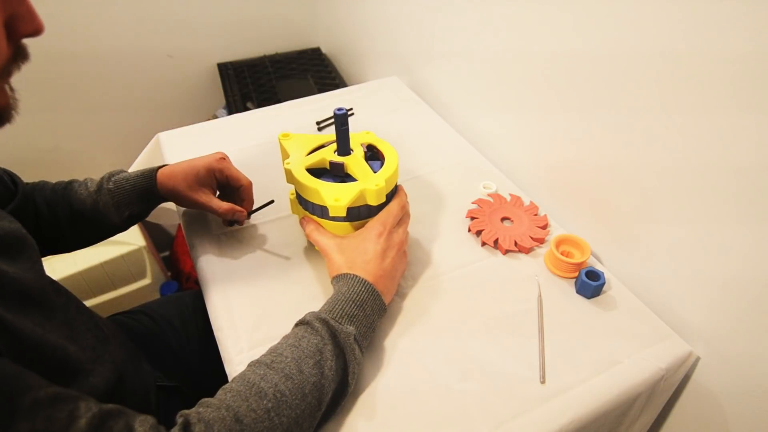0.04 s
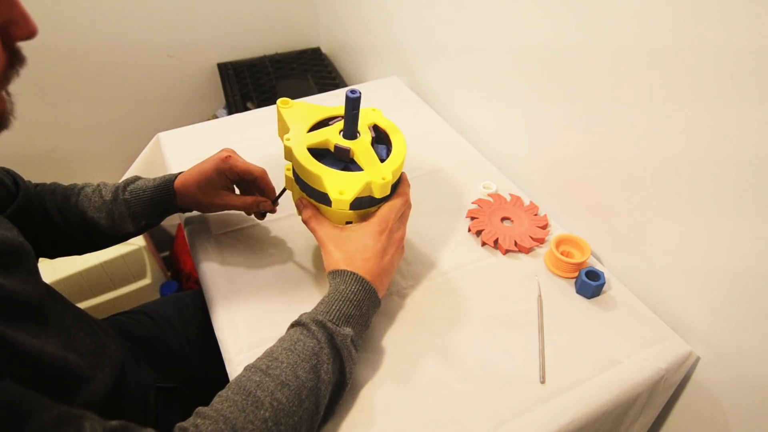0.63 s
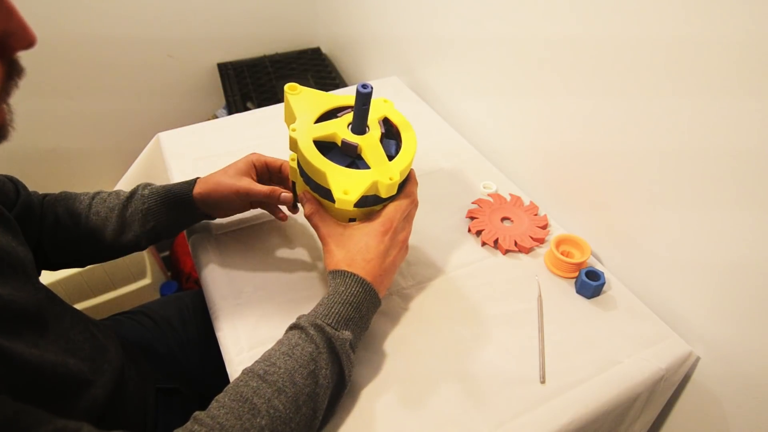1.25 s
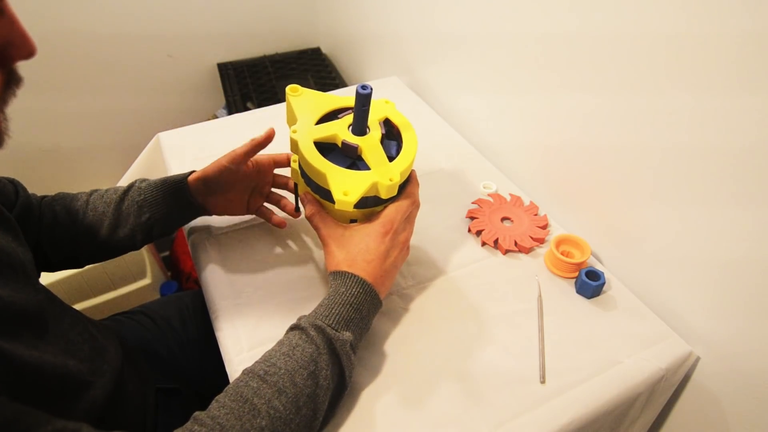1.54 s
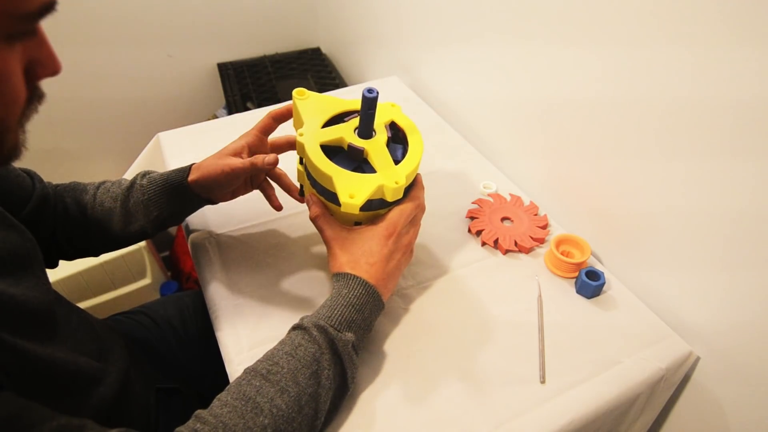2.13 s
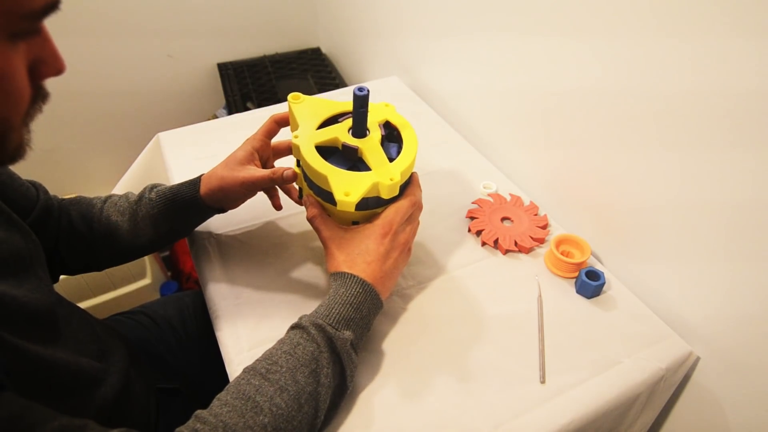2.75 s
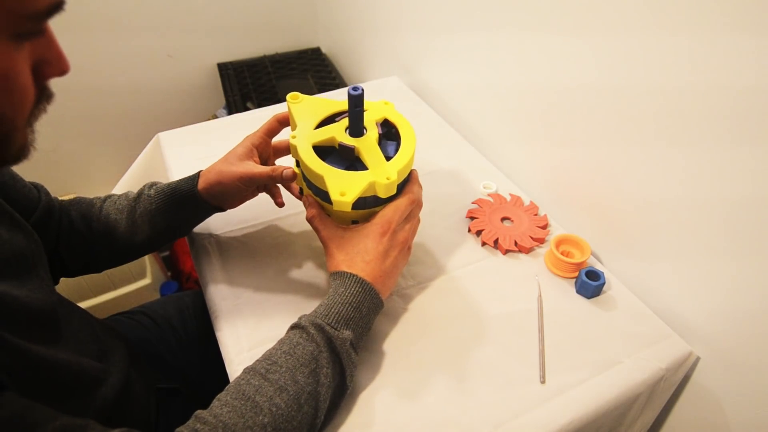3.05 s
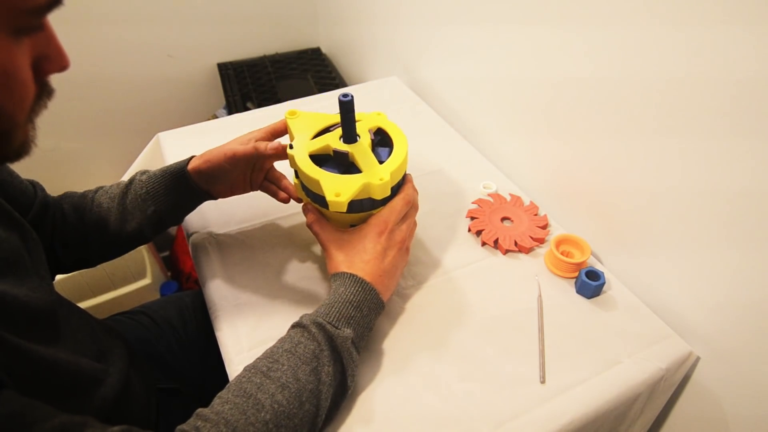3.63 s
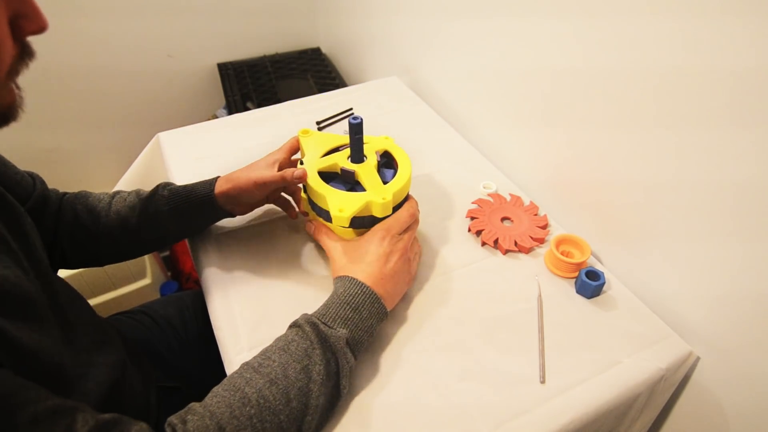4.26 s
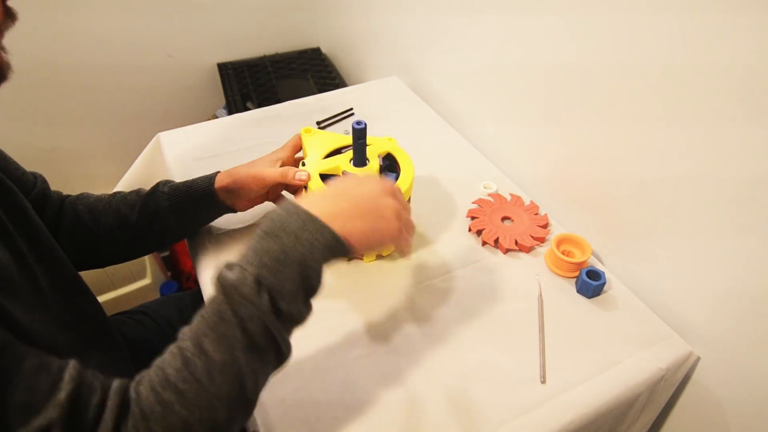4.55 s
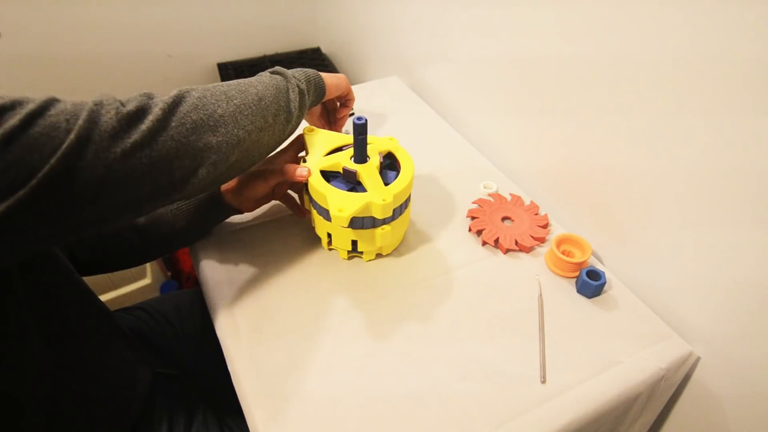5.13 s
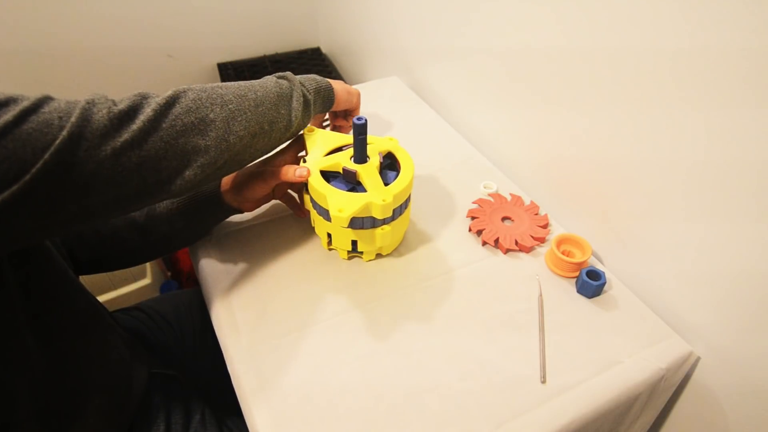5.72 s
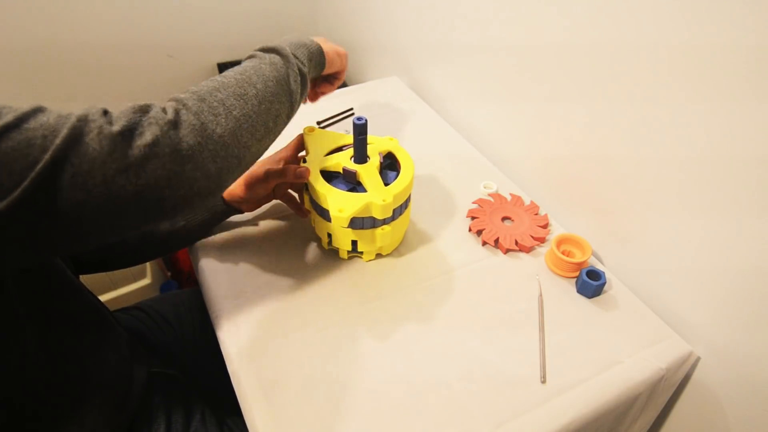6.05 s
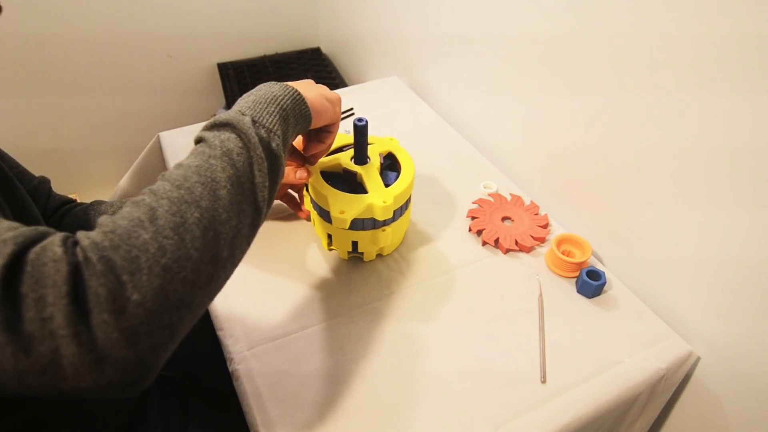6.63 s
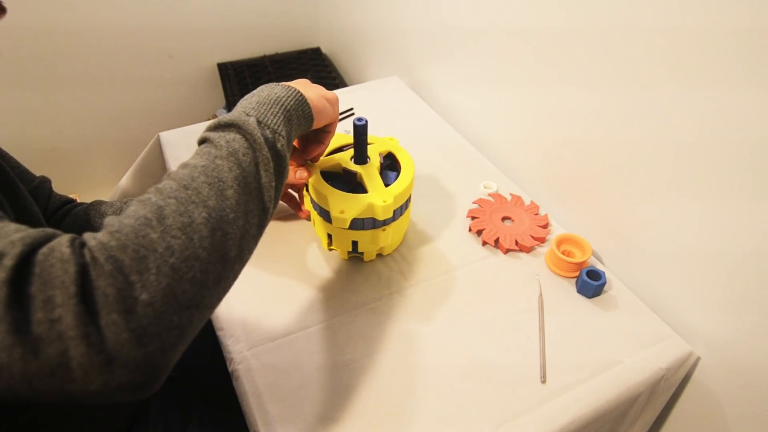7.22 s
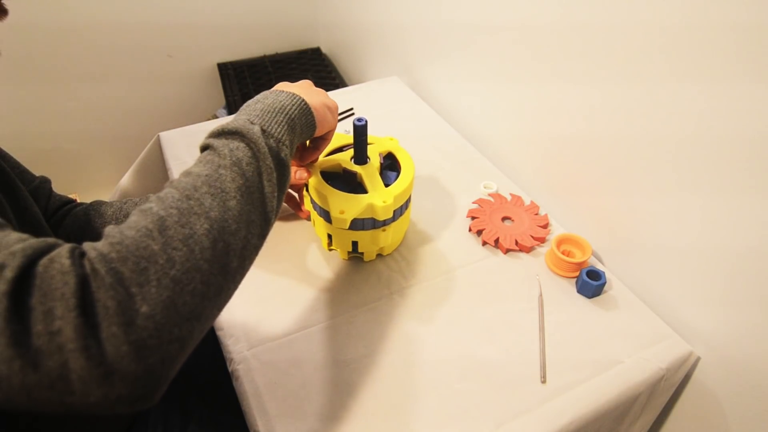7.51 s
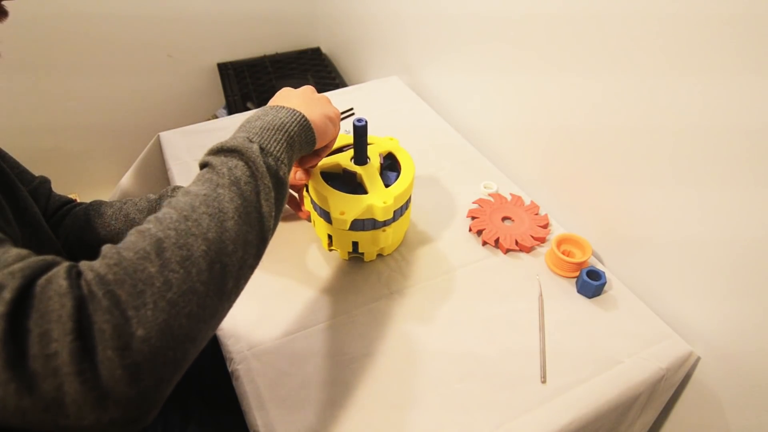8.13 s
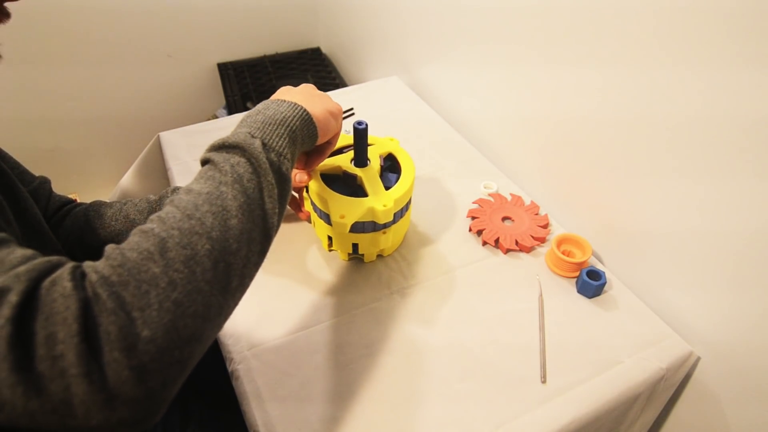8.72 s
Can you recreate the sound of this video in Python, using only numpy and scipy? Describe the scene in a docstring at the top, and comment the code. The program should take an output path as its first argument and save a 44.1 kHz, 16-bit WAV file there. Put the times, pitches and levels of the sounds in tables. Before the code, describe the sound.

Small steel bolts tap and click against a hollow plastic case, scraping briefly as they slide into their holes and seating with sharp clacks. The case is set down on a cloth-covered table with a soft, low knock, and a sleeve brushes faintly past. Then fingers pick among loose bolts, which chink lightly together. The sounds are fairly close, in a small, quiet room with a faint steady hiss.

```python
"""A small, quiet room with a steady hiss. Small steel bolts are fed into the holes of a hollow plastic
case: they tap the rim, ring the shell, scrape down on their threads and seat. The case is set down on
a cloth-covered table, whose top booms, and a sleeve brushes past. Then fingers pick among the loose
bolts, which chink steel on steel."""
import sys
import numpy as np
from scipy import signal
from scipy.fft import rfft, irfft, next_fast_len
from scipy.io import wavfile
from scipy.ndimage import uniform_filter1d

SR = 44100
rng = np.random.default_rng(int(sys.argv[2]) if len(sys.argv) > 2 else 0)


def materialize(psi):
    """Save the field psi as 16-bit PCM at rate SR to the path in sys.argv[1].

    A 1-D psi becomes a single channel; in a 2-D psi each row is a channel.
    """
    bounded = np.clip(np.atleast_2d(psi).T, -1, 1)
    quanta = np.round(bounded * 32767).astype(np.int16)
    wavfile.write(sys.argv[1], SR, quanta)


N = 386757
T = np.arange(SR // 2) / SR  # time axis of one event, s
LEAD_S = 0.012  # scuff ahead of each contact
FIRM_DB = -39  # reference level: a firm contact

# main modes of the hollow shell: f/Hz, level/dB, t60/s
SHELL_MODES = [(700, -18.5, 0.023), (896, -17.5, 0.057), (1155.3, 1.5, 0.074), (1219, 0, 0.041),
               (1325, -3, 0.057), (1430, -11.5, 0.044), (1606, -10, 0.024), (1720, -5, 0.028)]
# higher modes of the case: f/Hz, level/dB, t60/s
CASE_MODES = [(1635, 3, 0.24), (1733, -1, 0.17), (1920, -9, 0.062), (1890, -19, 0.051), (2175, -3.5, 0.2),
              (2390, 0.5, 0.09), (2800, 7, 0.031), (3390, -13, .07), (3220, -2, 0.037), (3813, 6.5, 0.075),
              (4630, -8, 0.065), (4920, -21.5, .06), (5100, -15.5, 0.041)]
# modes of one bolt: f/Hz, level/dB, t60/s
BOLT_MODES = [(3550, -9.5, 0.06), (3830, -2, .12), (4126, -4.5, 0.18), (4830, -9, 0.08), (6000, -12, 0.065)]
# contact noise, steel on plastic: f/Hz, level/dB
CRACK_SPECTRUM = [(50, -55), (300, -26.5), (500, -13), (800, -5.5), (1100, 0.5), (1500, 2), (2000, 7),
                  (3000, 0), (4300, -0.5), (5500, -8), (7000, -34), (10000, -33), (12000, -59.5)]
# hard treble edge of a contact: f/Hz, level/dB
EDGE_SPECTRUM = [(1500, -35.5), (4000, 5), (5500, 2), (6800, 2), (7900, -4.5), (9300, -3.5), (10300, -12),
                 (11500, -54.5), (14000, -25.5), (16000, -42.5)]


def amp(db):
    """Decibels to gain."""
    return 10 ** (np.asarray(db) / 20)


def unit_rms(x):
    """Scale to rms 1."""
    return x / np.sqrt(np.mean(x ** 2) + 1e-20)


def unit_energy(x):
    """Scale to energy 1."""
    return x / (np.linalg.norm(x) + 1e-20)


def unit_crest(x):
    """Scale the loudest 6 ms to rms 1."""
    return x / np.sqrt(uniform_filter1d(x ** 2, 256).max() + 1e-20)


def along(points, hz):
    """Interpolate (f/Hz, value) points on a log axis."""
    f, value = np.transpose(points)
    return np.interp(np.log(hz + 1), np.log(f + 1), value)


def coloured(x, spectrum):
    """Minimum-phase filter through (f/Hz, level/dB) points."""
    size = 2 * next_fast_len(len(x))
    gain = amp(along(spectrum, np.fft.rfftfreq(size, 1 / SR)))
    cepstrum = irfft(np.log(gain), size)
    cepstrum[1:size // 2] *= 2
    cepstrum[size // 2 + 1:] = 0
    return irfft(rfft(x, size) * np.exp(rfft(cepstrum)), size)[:len(x)]


def through(x, response):
    """Convolve, cut to one event."""
    return signal.fftconvolve(x, response)[:len(T)]


def add(track, at_s, sound):
    """Mix a sound into the track."""
    part = track[max(round(at_s * SR), 0):][:len(sound)]
    part += sound[:len(part)]


def rise(tau_s):
    """Exponential onset, 0 to 1."""
    return 1 - np.exp(-T / tau_s)


def on_contact(x):
    """Delay a ring to the end of the scuff."""
    return np.pad(x, (round(LEAD_S * SR), 0))[:len(T)]


def ring(modes, scatter_db, pitch=1):
    """Damped modes, struck at new strengths each time."""
    hz, db, t60_s = np.transpose(modes)[:, :, None]
    gain = amp(db + scatter_db * rng.standard_normal(hz.shape) - 60 * T / t60_s)
    sign = rng.choice([-1, 1], hz.shape)
    return unit_energy(np.sum(sign * gain * np.sin(2 * np.pi * pitch * hz * T), axis=0))


def chatter(t60_s, scuff_db=-60):
    """A rising scuff as parts meet, then a dense, fast-dying rattle."""
    t = T - LEAD_S
    level_db = np.where(t < 0, scuff_db + 14 * t / LEAD_S, -60 * t / t60_s)
    return unit_energy(rng.standard_normal(len(T)) * amp(level_db))


def room(x, wet_db):
    """Direct sound plus a diffuse tail from the near walls."""
    # room decay: f/Hz, t60/s
    decay = [(150, 0.24), (800, 0.22), (2000, 0.25), (5000, 0.22), (10000, 0.19)]
    hz, t, noise = signal.stft(rng.standard_normal(len(T)), SR, nperseg=256)
    fade = amp(-60 * t / along(decay, hz)[:, None])
    tail = signal.istft(noise * fade, SR, nperseg=256)[1][:len(T)]
    return x + amp(wet_db) * through(x, unit_energy(tail * rise(0.00057)))


def hiss():
    """Steady background of the room."""
    # room noise: f/Hz, level/dB
    spectrum = [(15, -56.5), (25, -28.5), (76, -5.5), (134, -7.5), (170, -4), (560, 0), (607, -0.5),
                (962, -2), (1070, -2.5), (1940, -6), (4370, -15), (7920, -25.5), (9320, -30), (11600, -45),
                (16000, -48)]
    return amp(-67) * unit_rms(coloured(rng.standard_normal(N), spectrum))


def sleeve_and_ticks():
    """Knitted cloth scratches unevenly with each sweep of the arm and gives off faint ticks."""
    # arm sweeps: centre t/s, half length/s, level/dB
    sweeps = [(0.0, 0.12, -78.5), (4.27, 0.28, -77), (4.883, 0.26, -82.5), (6.2, 0.25, -94)]
    # cloth friction: f/Hz, level/dB
    cloth_spectrum = [(1500, -11), (4000, -1.5), (6800, 0.5), (7900, -8), (8600, 1.5), (9600, 1),
                      (10400, -6), (11300, -23.5), (16000, -51.5)]
    # cloth ticks: t/s
    tick_times = [7.326, 8.167, 8.274, 8.445, 8.669, 8.735]
    # thin tick noise: f/Hz, level/dB
    tick_spectrum = [(6000, -30), (9000, -9), (9700, 5), (10500, -11), (11500, -21), (13000, -50)]
    stir_db, tick_db = -90.5, -78.5
    t = np.arange(N) / SR
    motion = amp(stir_db) + sum(amp(db) * np.exp(-((t - s) / half_s) ** 2) for s, half_s, db in sweeps)
    scratch_db = 2 * unit_rms(uniform_filter1d(rng.standard_normal(N), size=700))
    out = motion * amp(scratch_db) * unit_rms(coloured(rng.standard_normal(N), cloth_spectrum))
    for at_s in tick_times:
        tick = unit_crest(coloured(chatter(t60_s=0.089), tick_spectrum))
        add(out, at_s - LEAD_S, amp(tick_db) * tick)
    return out


def base_ring(focus_hz):
    """Where the base is struck decides which modes speak most."""
    # modes of the case's base: f/Hz, level/dB, t60/s
    modes = [(271, 4, 0.3), (268.5, -8.5, 0.14), (381, -3, 0.19), (478, 4, 0.035), (534, 6.5, 0.048),
             (749, -3, 0.17), (850, -11, 0.11)]
    driven = [(hz, db - 20 * abs(np.log2(hz / focus_hz)), t60_s) for hz, db, t60_s in modes]
    return ring(driven, scatter_db=4.5)


def table_bumps():
    """Cloth softens each landing: the base knocks, the table top booms."""
    # case meets table: t/s, level/dB, relative boom level/dB, hardest-driven f/Hz
    landings = [(0.03, -57, -21, 283), (0.112, -58.5, -10, 292), (4.041, -41.5, -13, 490),
                (4.091, -41, -3, 447), (4.109, -55, 7.5, 267), (4.333, -45, -34, 660),
                (4.409, -47, -22, 524), (5.239, -57.5, -2.5, 393), (5.573, -58.5, -13, 496)]
    # modes of the table top: f/Hz, level/dB, t60/s
    top_modes = [(50, -26.5, 0.57), (96, -12.5, 0.24), (167, -2, 0.22), (246, 0, 0.15), (291.5, 6, 0.083)]
    # cushioned contact noise: f/Hz, level/dB
    thud_spectrum = [(30, -20), (100, -25), (300, -13), (600, 0.5), (1300, -11), (2000, -20), (6000, -29),
                     (11000, -61)]
    top = sum(amp(db - 60 * T / t60_s) * np.sin(2 * np.pi * hz * T) for hz, db, t60_s in top_modes)
    boom = unit_crest(on_contact(top * rise(0.0027)))
    out = np.zeros(N)
    for at_s, db, boom_db, focus_hz in landings:
        base = on_contact(base_ring(focus_hz) * rise(0.0034))
        thud = unit_energy(coloured(chatter(t60_s=0.16), thud_spectrum))
        knock = unit_crest(room(base + 0.5 * thud, wet_db=-1.5))
        add(out, at_s - LEAD_S, amp(db - 4.5) * knock + amp(db + boom_db + 1) * boom)
    return out


def contact(db, tilt_db_oct, t60_s, modes, spectrum,
            modes_db, bolt_db, body_db, edge_db, wet_db, detune, bolt_pitch=1):
    """A blow cracks and rings the struck part and the bolt; brighter, looser blows have more edge."""
    scuff_db = min(-12.5 - 0.8 * (db - FIRM_DB), 0)  # harder blow, less scuff
    grip_pitch = 1 + detune * rng.standard_normal()
    looseness = np.log2(t60_s / 0.04)  # doublings of the usual rattle time
    rings = amp(modes_db + 4 * looseness) * ring(modes, scatter_db=3.5, pitch=grip_pitch)
    rings += amp(bolt_db + 11 * looseness) * ring(BOLT_MODES, scatter_db=4.5, pitch=bolt_pitch)
    # treble loss from finite contact time: f/Hz, level/dB
    rolloff = [(8000, -0.5), (10000, -5.5), (12000, -31)]
    rings = on_contact(coloured(rings, rolloff))
    crack = unit_energy(coloured(chatter(t60_s, scuff_db), spectrum))
    tilt = [(625, -2 * tilt_db_oct), (10000, 2 * tilt_db_oct)]  # pivot at 2.5 kHz
    body = coloured(crack + rings, tilt)
    edge = coloured(chatter(t60_s, scuff_db), EDGE_SPECTRUM)
    body = amp(body_db) * unit_crest(room(body, wet_db))
    edge = amp(edge_db + 0.81 * tilt_db_oct + 1.7 * looseness) * unit_crest(room(edge, wet_db))
    return amp(db) * (body + edge)


def shell_ring():
    """The hollow shell swells over a few ms; the grip shifts its modes from blow to blow."""
    grip_pitch = 1 + 0.011 * rng.standard_normal()
    return unit_energy(ring(SHELL_MODES, scatter_db=2, pitch=grip_pitch) * rise(0.0052))


def shell_answer():
    """The shell's ring after one blow, heard in the room."""
    return unit_crest(room(on_contact(shell_ring()), wet_db=-8.5))


def bolt_taps():
    """A bolt clacks on the case, wakes the shell, and wakes it again as it falls back."""
    # bolt meets case: t/s, level/dB, relative shell level/dB, tilt/(dB/oct), rattle t60/s
    blows = [(0.047, -50, -7, 2.5, .037), (0.1098, -35.5, -13.5, -6.5, 0.043),
             (0.563, -36.5, -6.5, -9, 0.019), (0.634, -46, -16, -8, 0.046), (0.6443, -32.5, -5, -5, 0.052),
             (0.741, -56.5, 3, -6, 0.03), (0.8855, -39, -4.5, -5, 0.013), (0.949, -51.5, -0.5, -2, 0.045),
             (1.2484, -38.5, 2, -7, 0.041), (1.368, -36.5, -1, -4, 0.042), (1.3916, -28, 0, -4, 0.061),
             (1.4092, -26.5, -10, -5, 0.035), (1.8233, -23.5, -2, 0, 0.056),
             (2.082, -47.5, 0.5, -4.5, 0.046), (2.953, -50, -1.5, 6, 0.037),
             (3.0313, -36, -11, -1.5, 0.071), (3.0367, -20, -14, -1.5, 0.089),
             (3.043, -16.5, -10.5, 4.5, 0.058), (3.238, -35.5, -6, 2, 0.036),
             (3.5305, -16, -19, 0.5, 0.018), (4.089, -40.5, -4.5, -8.5, 0.023),
             (4.178, -53.5, -25, 10, 0.033), (4.409, -40, -6, -7, 0.032), (4.4767, -44, -11, -7.5, .028),
             (4.531, -48.5, -25, -14, 0.032)]
    out = np.zeros(N)
    for at_s, db, shell_db, tilt_db_oct, t60_s in blows:
        clack = contact(db, tilt_db_oct, t60_s, CASE_MODES, CRACK_SPECTRUM, modes_db=-10, bolt_db=-14,
                        body_db=-10, edge_db=-25.5, wet_db=-2.5, detune=0.006)
        shell_gain = amp(db + shell_db - 5)
        add(out, at_s - LEAD_S, clack + shell_gain * shell_answer())
        rebound_s = 0.014 * (1 + 0.1016 * rng.standard_normal())
        add(out, at_s - LEAD_S + rebound_s, shell_gain * amp(-3.5) * shell_answer())
    return out


def squeak(stroke):
    """Stick-slip locks on to the shell's strongest mode."""
    mode_hz = max(SHELL_MODES, key=lambda mode: mode[1])[0]
    drift = unit_rms(uniform_filter1d(rng.standard_normal(len(T)), size=400))
    phase = 2 * np.pi * np.cumsum(mode_hz * (1 + 0.0055 * drift)) / SR
    return unit_energy(stroke * rise(0.004) * np.sin(phase))


def thread_scrapes():
    """Thread ridges tick over the hole's lip; a hard push is faster, squeaks and damps the bolt."""
    # bolt slides down a hole: start t/s, end t/s, level/dB
    pushes = [(1.840, 1.935, -42), (3.238, 3.346, -49), (3.475, 3.534, -56)]
    ordinary_db, release_s = -50, 0.012
    out = np.zeros(N)
    for start_s, end_s, db in pushes:
        push_db = db - ordinary_db
        rise_s = 0.0041 * amp(-1.6 * push_db)
        stroke = rise(rise_s) * np.clip((end_s - start_s - T) / release_s, 0, 1)
        ridge_hz = 648 * amp(0.42 * push_db) * (1 + 0.73 * rng.standard_normal(len(T)))
        ticks = np.diff(np.floor(np.cumsum(ridge_hz) / SR), prepend=0)
        force = stroke * (1.1 * unit_rms(ticks) + rng.standard_normal(len(T)))
        scrape = unit_energy(coloured(force, CRACK_SPECTRUM))
        scrape += amp(-14 - 0.58 * push_db) * unit_energy(coloured(force, EDGE_SPECTRUM))
        for part_db, response in ((-18.5, ring(CASE_MODES, scatter_db=10)),
                                  (1, shell_ring()),
                                  (-9 - 0.94 * push_db, ring(BOLT_MODES, scatter_db=2)),
                                  (-19.5 + 0.75 * push_db, base_ring(focus_hz=530))):
            scrape += amp(part_db) * unit_energy(through(force, response))
        sound = room(scrape, wet_db=-4.5)
        sound += amp(-3.5 + 0.94 * push_db) * room(squeak(stroke), wet_db=-16)
        add(out, start_s, amp(db) * np.linalg.norm(stroke) * sound)
    return out


def loose_bolts():
    """Steel chinks on steel beside the case, whose shell hums along faintly."""
    # bolt meets bolt: t/s, level/dB, tilt/(dB/oct), rattle t60/s
    clicks = [(6.5863, -31.5, -1.5, .046), (6.6033, -38, -2, 0.13), (6.640, -36.5, 2.5, 0.056),
              (6.671, -42.5, 4, 0.042), (6.814, -47, -6.5, 0.075), (6.883, -51, -2, 0.055),
              (6.934, -36.5, -6, 0.083), (6.947, -24.5, 3, 0.039), (7.114, -45.5, -12, 0.023),
              (7.524, -47.5, -2, 0.022), (7.6589, -36.5, -3, 0.03), (7.6968, -38.5, 5.5, .04),
              (7.798, -42.5, -7.5, 0.028), (7.859, -45.5, 0, 0.038), (7.914, -51, -6, 0.037)]
    # modes of bolts lying together: f/Hz, level/dB, t60/s
    steel_modes = [(2045, -2.5, 0.071), (2530, -14, 0.045), (2735, -2.5, 0.096), (3250, -18, 0.059),
                   (3440, 0, 0.15), (3780, 2, 0.099), (3940, -8, 0.19), (4370, -17, 0.071),
                   (5530, -23, 0.073), (7100, -29, 0.067), (8900, -11, 0.13)]
    # contact noise, steel on steel: f/Hz, level/dB
    chink_spectrum = [(200, -38), (800, -10), (1200, -4), (1550, -2.5), (2100, 12.5), (3000, 6.5),
                      (4200, 8.5), (5500, -4.5), (7000, -0.5), (10000, -35), (12000, -67)]
    out = np.zeros(N)
    for at_s, db, tilt_db_oct, t60_s in clicks:
        chink = contact(db, tilt_db_oct, t60_s, steel_modes, chink_spectrum, modes_db=-5.5, bolt_db=-6,
                        body_db=-12.5, edge_db=-24.5, wet_db=-4.5, detune=0.0153, bolt_pitch=0.97)
        shell_db = -63 + 0.28 * (db - FIRM_DB)
        add(out, at_s - LEAD_S, chink + amp(shell_db) * shell_answer())
    return out


def radiated(x, corner_hz):
    """Small parts push little air at low frequencies."""
    return signal.sosfilt(signal.butter(2, corner_hz, "high", fs=SR, output="sos"), x)


def scene():
    """All sources, mono."""
    bolts = radiated(bolt_taps() + loose_bolts() + thread_scrapes(), corner_hz=330)
    return (bolts + table_bumps() + sleeve_and_ticks() + hiss())[None]


def record(dry):
    """Brick-wall low-pass."""
    top_hz = 16000
    return irfft(rfft(dry) * (np.fft.rfftfreq(N, 1 / SR) < top_hz), N)


dry = scene()
out = record(dry)
materialize(out)
```